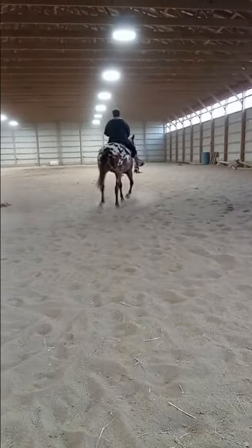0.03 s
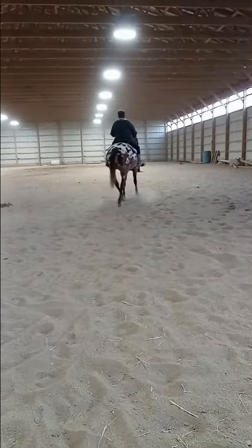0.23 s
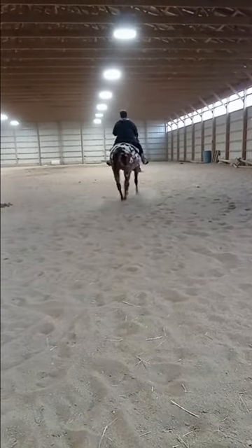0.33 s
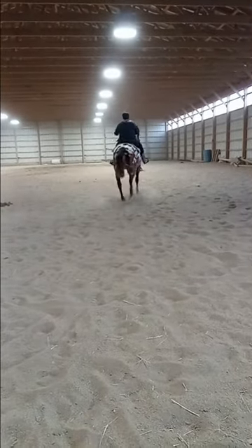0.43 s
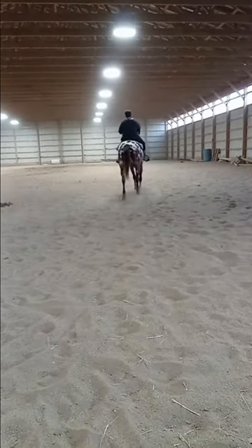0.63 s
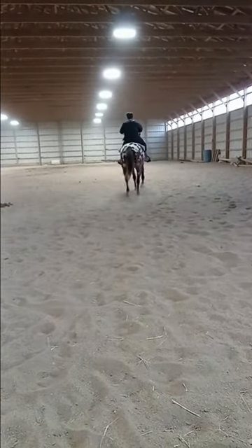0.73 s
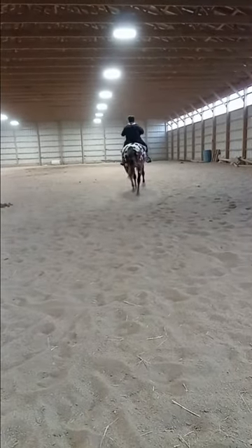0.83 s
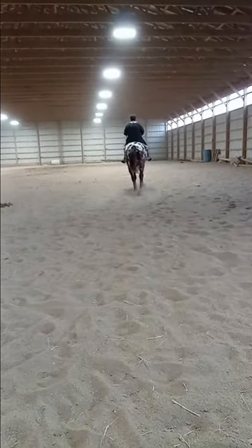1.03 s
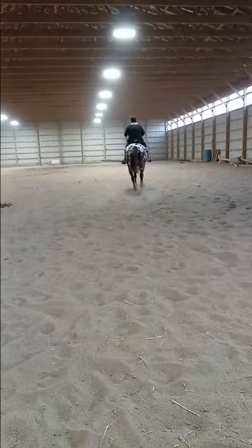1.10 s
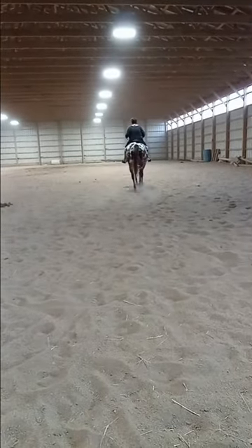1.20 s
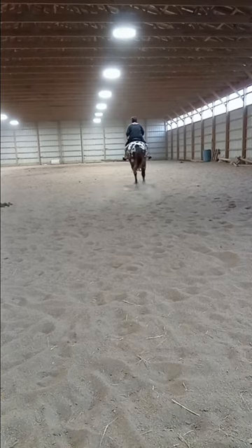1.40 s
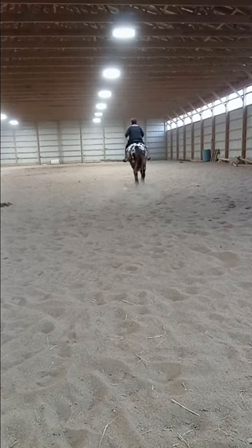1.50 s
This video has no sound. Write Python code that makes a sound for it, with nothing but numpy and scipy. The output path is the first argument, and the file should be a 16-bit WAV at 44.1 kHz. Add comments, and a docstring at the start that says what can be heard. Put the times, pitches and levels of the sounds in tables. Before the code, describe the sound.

A horse trots away over deep sand in a large wooden hall. Quiet rumble and hiss run throughout. The strongest dull hoof thud lands about 0.24 s, with crunchy sand spray and quick wall returns; another, lower, comes near 0.61 s, then softer ones around 0.96 and 1.05 s. Faint hollow creaks accompany the beats. Small bright snaps tick at 1.04 and 1.43 s as weak thuds and grit fade.

```python
"""A large wooden riding hall, taken on a phone's two microphones as a horse trots away over deep sand.
From the start the hall's air rumbles and hisses, and noise bursts with ringing crunch are sprayed sand.
Hooves soon follow as short low swings of pitch that roof and walls return; rough gliding tones creak.
Late on, two bright noise bursts snap. The microphones differ in colour; the left hears nearly everything
a little late, but two thumps reach it first."""
import sys
import numpy as np
from scipy import signal
from scipy.fft import rfft, irfft
from scipy.io import wavfile
from scipy.ndimage import uniform_filter1d, map_coordinates

SR = 44100
rng = np.random.default_rng(int(sys.argv[2]) if len(sys.argv) > 2 else 0)


def wav_out(sig):
    """Save sig, one row per channel (or a flat mono array), as 16-bit PCM at SR to the path in sys.argv[1]."""
    wavfile.write(sys.argv[1], SR, np.round(np.clip(np.atleast_2d(sig).T, -1, 1) * 32767).astype(np.int16))


N = 68355
LEFT_LAG_S = 0.00098


def undb(db):
    """Turn dB into an amplitude gain."""
    return 10 ** (np.asarray(db, float) / 20)


def level(x, db):
    """Scale to an rms level in dB."""
    return x * undb(db) / np.sqrt(np.mean(x ** 2))


def bin_hz():
    """Frequency of every FFT bin, raised 1 Hz so that its logarithm exists."""
    return np.arange(N // 2 + 1) * SR / N + 1


def read(table):
    """Read an (f/Hz, value) table at every FFT bin, straight lines over log frequency."""
    hz, value = np.array(table).T
    return np.interp(np.log(bin_hz()), np.log(hz), value)


def colour(x, table):
    """Filter by an (f/Hz, gain/dB) curve."""
    return irfft(rfft(x) * undb(read(table)), N)


# How far diffuse sound differs between the two microphones: f/Hz, unlike share/0-1
MICROPHONE_UNLIKENESS = [(60, 0.3), (200, 1), (500, 0.87), (2000, 1)]


def noise():
    """Noise at both microphones: wavelengths long beside their spacing arrive more alike."""
    share = read(MICROPHONE_UNLIKENESS)
    left, other = rfft(rng.standard_normal((2, N)))
    right = np.sqrt(1 - share) * left + np.sqrt(share) * other
    return irfft(np.array([left, right]), N)


def ring(x, hz, t60):
    """Excite one exponentially decaying resonance."""
    pole = np.exp(2j * np.pi * hz / SR - np.log(1000) / (t60 * SR))
    return signal.lfilter([1], [1, -pole], x).imag


def walk(rate):
    """Smoothed random steps, rate per second, scaled to a spread of 1."""
    k = int(SR / rate)
    steps = np.repeat(rng.standard_normal(N // k + 1), k)
    x = uniform_filter1d(uniform_filter1d(steps, k), k)[:N]
    return x / x.std()


HALL_GAP_S = 0.018


def hall(x, t, t60):
    """Diffuse echoes: decaying noise of unit energy that begins after a gap."""
    tail = noise() * (t > HALL_GAP_S) * undb(-60 * t / t60)
    tail = tail / np.sqrt(np.sum(tail ** 2, axis=1, keepdims=True))
    return signal.fftconvolve(x[None], tail, axes=1)[:, :N]


# Spectrum of the standing air in the hall: f/Hz, relative level/dB per Hz
AIR_SPECTRUM = [(15, -49), (25, -5.5), (156, -5), (205, 0), (351, -6.5), (728, -9.5), (953, -16.5),
                (1150, -12.5), (1730, -16), (2450, -15), (6130, -17.5), (8030, -26.5), (10200, -27),
                (11100, -44), (15800, -29.5)]
# Slow course of the air's treble: t/s, relative level/dB
AIR_TREBLE = [(.1, -0.5), (.47, -2), (.85, -3.5), (1.24, -2), (1.5, -0.5)]
AIR_DB, WAVER_DB, WAVER_PER_S = -69, 1.0, 8.04


def air(t):
    """Quiet rumble and hiss; octave bands waver independently and the treble dips, then recovers."""
    both = rfft(colour(noise(), AIR_SPECTRUM))
    octave = np.log2(bin_hz())
    treble_db = np.interp(t, *np.array(AIR_TREBLE).T)
    out = 0
    for centre in range(4, 15):  # powers of two in Hz
        band_share = np.clip(1 - abs(octave - centre), 0, 1)
        db = WAVER_DB * walk(WAVER_PER_S) + treble_db * (centre > 10)
        out = out + irfft(both * band_share, N) * undb(db)
    return level(out, AIR_DB)


# Sand thrown by a hoof: t/s, rise/s, hiss level/dB, hiss t60/s, crunch t60/s,
# then crunch level/dB in the low, middle, upper and top group
SAND_SPRAYS = [(-.02, 0.0084, -87, .5, 0.28, -76, -71, -73, -74),
               (0.173, 0.0025, -68.5, 0.5, 0.62, -83, -64, -65.5, -79),
               (.224, 0.014, -60, 0.33, 0.022, -61.5, -59.5, -58.5, -83),
               (0.252, 0.0089, -60.5, 0.48, 0.044, -60.5, -51.5, -59, -69.5),
               (0.518, 0.028, -69, 0.35, 0.27, -76, -86, -74, -89),
               (0.551, 0.017, -76, 0.56, 0.36, -66, -60, -62.5, -86),
               (0.582, 0.012, -64, 1, 0.083, -67, -65, -54, -66),
               (0.622, 0.0069, -65, 0.23, 1, -77, -70.5, -87, -82),
               (0.902, 0.0047, -83, .3, .1, -65, -66, -84, -96),
               (0.913, 0.0061, -66.5, 1, 0.17, -59, -62.5, -60, -76),
               (1.033, 0.0036, -78, 0.057, 0.059, -67.5, -68, -60.5, -81),
               (1.054, 0.0084, -66.5, 0.91, 0.65, -84, -68.5, -104, -78.5),
               (1.17, 0.0052, -82, 0.034, 0.036, -71, -72, -63, -77),
               (1.274, 0.0091, -70.5, 0.72, 0.25, -74.5, -72.5, -72, -92),
               (1.317, 0.011, -68, 0.63, 0.13, -87, -67, -60.5, -95),
               (1.435, 0.0057, -71, 0.44, 0.18, -71.5, -68.5, -60, -66.5)]
# Spectrum of the sand's hiss: f/Hz, relative level/dB per Hz
SAND_SPECTRUM = [(410, -5.5), (700, -1.5), (797, -7.5), (1560, -3), (1970, -2.5), (3190, -1.5), (5640, -26),
                 (9600, -18), (11800, -31), (15500, -31)]
# Crunch resonances in four groups, each ring passed twice: f/Hz, relative level/dB, t60 of one pass/s
CRUNCH_MODES = [
    [(2150, 0, .007), (2750, -7, .004)],
    [(3250, 0, .005), (4500, -2, .004)],
    [(5450, 0, .008), (5950, 0, .008)],
    [(7500, 0, .011), (8700, -3, .007), (9400, -2, .011)],
]
GRAIN_DB, SPRAY_UNLIKE = 2.8, 0.79  # mean random boost of a sample; share unlike between microphones
SPRAY_HALL_DB, SPRAY_HALL_T60_S = -8.5, 0.27


def crunch(grains, group):
    """Sand grains strike a group of short resonances, mixed to an rms of 1."""
    modes = [level(ring(ring(grains, hz, t60), hz, t60), db) for hz, db, t60 in group]
    return level(sum(modes), 0)


def sprays(t):
    """Grainy hiss of sand with resonant crunch, each fading at its own pace, then diffuse echoes."""
    grains = rng.standard_normal((2, N)) * undb(GRAIN_DB * rng.exponential(size=N))
    grains[1] = np.sqrt(1 - SPRAY_UNLIKE) * grains[0] + np.sqrt(SPRAY_UNLIKE) * grains[1]
    hiss = level(colour(grains, SAND_SPECTRUM), 0)
    layers = [hiss] + [crunch(grains, group) for group in CRUNCH_MODES]
    power = np.zeros((5, N))
    for s, rise, hiss_db, hiss_t60, crunch_t60, *crunch_db in SAND_SPRAYS:
        since_peak = np.maximum(t - s - rise, 0)
        hiss_fall = hiss_db - 60 * since_peak / hiss_t60
        crunch_falls = [db - 60 * since_peak / crunch_t60 for db in crunch_db]
        attack = np.clip((t - s) / rise, 0, 1)
        power += (undb([hiss_fall] + crunch_falls) * attack) ** 2
    direct = sum(np.sqrt(p) * x for p, x in zip(power, layers))
    return direct + undb(SPRAY_HALL_DB) * hall(direct[0], t, SPRAY_HALL_T60_S)


# Hoof thumps and their clearest returns from the walls, before the microphones' colour:
# centre t/s, peak level/dB, centre f/Hz, half-width/cycles, hall send relative to the thump/dB
HOOF_THUMPS = [(.095, -67, 120, 1.1, 6.5), (.187, -47.5, 158, 0.73, 4.5), (.198, -51.5, 116, 0.88, -2),
               (.2105, -45.5, 108.7, 0.89, -6), (.228, -53, 132, 0.67, 8),
               (0.2387, -25.5, 235.4, 1.3, -15.5), (0.253, -42.5, 93, 2.4, -4),
               (.2615, -34.5, 260, 0.71, -1.5), (.270, -31.5, 219, 1.8, -22), (.306, -40, 258, 0.77, -12),
               (.324, -39.5, 213, 1.4, -21), (0.344, -45.5, 223, 1.1, -1.5),
               (0.364, -48.5, 256.5, 3.96, 1.5), (.379, -44.5, 250, 2.2, -7), (0.409, -45.5, 250, 2, -11),
               (.427, -44.5, 254, 1.55, -12), (.6103, -29, 127, 0.88, -15), (.632, -33, 160, 1.18, -21),
               (.6415, -36, 146, 1.6, -21), (.656, -45, 161, 2.2, -23), (.669, -40, 140, 0.5, -17),
               (.6775, -42.5, 150, 0.7, -17), (.70, -54.5, 242, 2, -11), (.762, -59.5, 92.6, 1.9, 4.5),
               (0.786, -52.5, 140, 1.5, -19), (.830, -46, 131, 0.33, -2.5), (.946, -54.5, 152, 2.2, -29),
               (.9615, -41.5, 179, 0.4, -12), (.971, -50, 306, 1.7, -3), (.977, -47.5, 118, 2.1, -8),
               (1.0435, -37, 123, 0.53, -2.5), (1.0655, -37, 144.5, 1.5, -11.5),
               (1.08, -38.5, 158, 0.79, -21), (1.098, -42.5, 207, 1.07, -6.5), (1.113, -48, 147, 2.9, -10),
               (1.123, -47, 200, 2.8, -9.5), (1.14, -53.5, 231, 2.3, -16), (1.16, -56, 127, 1.6, -1),
               (1.21, -59.5, 155, 1.7, 5), (1.27, -55, 188, 1.8, 1), (1.378, -57.5, 98.5, 0.92, 3),
               (1.44, -65.5, 177, 1.5, 2)]
# Rows of the thump table, counted from 0, that come from the other side
OTHER_SIDE_ROWS = (7, 9)
THUMP_SAG, HALL_T60_S = .16, 0.59  # share of the centre pitch lost per cycle; hall decay


def thumps(t):
    """The ground swings for a cycle or so under each hoof, sagging in pitch, and the hall answers."""
    direct, send = np.zeros((2, N)), np.zeros(N)
    for row, (s, db, hz, cycles, send_db) in enumerate(HOOF_THUMPS):
        # the right is held back two lags here; scene() delays the left by one, so the left leads
        right_lag = 2 * LEFT_LAG_S if row in OTHER_SIDE_ROWS else 0
        turn = np.clip((t - s - np.array([[0], [right_lag]])) * hz, -8, 8)
        shape = np.exp(-2 * (turn / cycles) ** 2)
        swing = np.cos(2 * np.pi * turn * (1 - THUMP_SAG * turn / 2))
        thump = undb(db) * shape * swing
        direct = direct + thump
        send = send + undb(send_db) * thump[0]
    return direct + hall(send, t, HALL_T60_S)


# Hollow creaks, perhaps saddle leather: start t/s, length/s, nominal level/dB, f/Hz at start, f/Hz at end,
# extra level on the right/dB, depth of throb
HOLLOW_CREAKS = [(0.23, 0.063, -59.5, 640, 610, 7.5, 1.6), (0.289, 0.1, -59, 393, 330, -6, 0.84),
                 (0.341, 0.0676, -56.5, 747, 630, -20, 0.49), (0.592, 0.198, -58.5, 600.8, 545, 1, 3),
                 (0.665, 0.054, -54.5, 615, 600, -8, 0.39), (0.608, 0.03, -56.5, 500, 476, 2, 0.35),
                 (0.969, 0.032, -60, 398.5, 280, -9, 1.5), (1.087, 0.091, -59, 412, 390, -1, 1)]
CREAK_PER_S = 360  # random throb steps per second


def creaks(t):
    """A rough hollow tone that sags in pitch and throbs unevenly, differently left and right."""
    out = np.zeros((2, N))
    for s, length, db, hz_start, hz_end, right_db, depth in HOLLOW_CREAKS:
        u = np.clip((t - s) / length, 0, 1)
        wander = [walk(CREAK_PER_S) + 1j * walk(CREAK_PER_S) for _ in range(2)]
        throb = 1 + depth * np.array(wander)
        throb = throb / np.sqrt(abs(throb))  # soften the swings in level, keep those in phase
        phase = 2 * np.pi * np.cumsum(hz_start + (hz_end - hz_start) * u) / SR
        tone = (throb * np.exp(1j * phase)).imag / 2
        fade = np.minimum(np.sin(np.pi * u) * 2.1, 1)
        out = out + undb([[db], [db + right_db]]) * tone * fade
    return out


# Sharp snaps, perhaps grit on a shoe: t/s, level after the rise/dB, t60/s
SHARP_SNAPS = [(1.035, -52, 0.014), (1.434, -58, 0.02)]
# Spectrum of the snaps: f/Hz, relative level/dB per Hz
SNAP_SPECTRUM = [(1000, -31), (3000, -8), (5500, 7), (7000, -5), (8600, 1), (10300, -16), (11600, -10),
                 (13000, -24)]
SNAP_RISE_S = .003


def snaps(t):
    """Very short bright bursts of noise with a quick rise and exponential fall."""
    envelope = np.zeros(N)
    for s, db, t60 in SHARP_SNAPS:
        fall = undb(db - 60 * np.maximum(t - s - SNAP_RISE_S, 0) / t60)
        envelope += fall * np.clip((t - s) / SNAP_RISE_S, 0, 1)
    return envelope * level(colour(noise(), SNAP_SPECTRUM), 0)


def scene():
    """Sum all sources at the two microphone ports and delay the left port's sum by one lag."""
    t = np.arange(N) / SR
    left, right = air(t) + sprays(t) + thumps(t) + creaks(t) + snaps(t)
    delayed_left = map_coordinates(left, [(t - LEFT_LAG_S) * SR], mode="mirror")
    return np.array([delayed_left, right])


# Left microphone's sensitivity minus the right's: f/Hz, level/dB
LEFT_MINUS_RIGHT = [(60, 8), (250, 12), (700, 7.5), (1300, 11.5), (2400, 14.5), (6000, 13), (8000, 7.5),
                    (9500, -18), (15000, -7.5)]
# Bass response shared by both microphones: f/Hz, level/dB
MICROPHONE_BASS = [(25, -17), (52, -17), (78, 1), (120, 0)]
TOP_HZ = 15720


def record(dry):
    """Each microphone has its colour; the deep bass is weak and the top cut steeply."""
    ratio = undb(read(LEFT_MINUS_RIGHT))
    # the two gains share a fixed summed power
    gains = np.array([ratio, np.ones_like(ratio)]) * 2 / np.sqrt(1 + ratio ** 2)
    pair = irfft(rfft(dry) * gains * undb(read(MICROPHONE_BASS)), N)
    top_cut = signal.ellip(10, .2, 70, TOP_HZ, fs=SR, output="sos")
    return signal.sosfilt(top_cut, pair)


dry = scene()
out = record(dry)
wav_out(out)
```